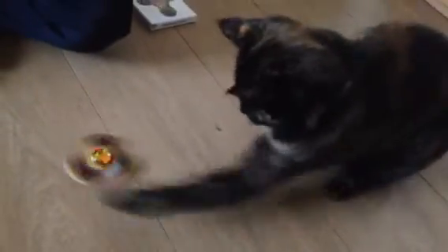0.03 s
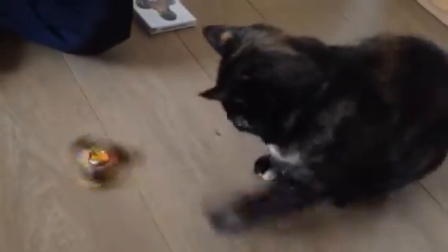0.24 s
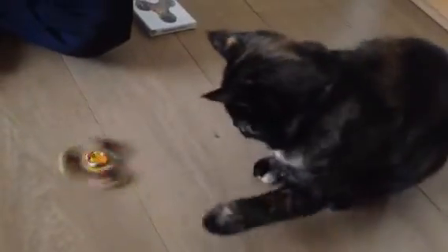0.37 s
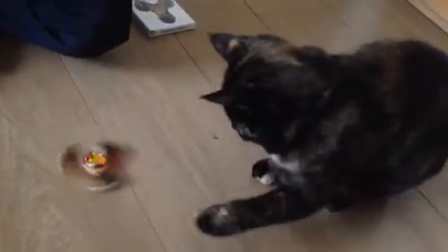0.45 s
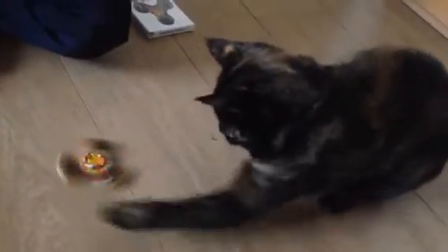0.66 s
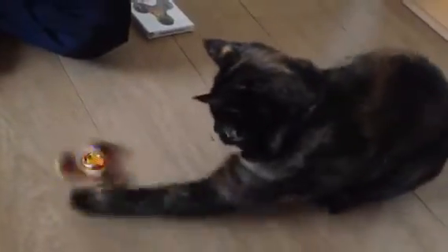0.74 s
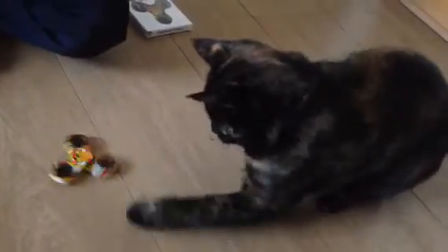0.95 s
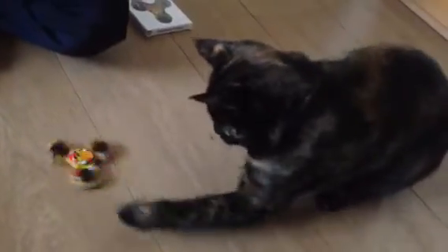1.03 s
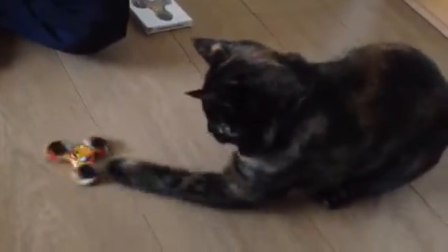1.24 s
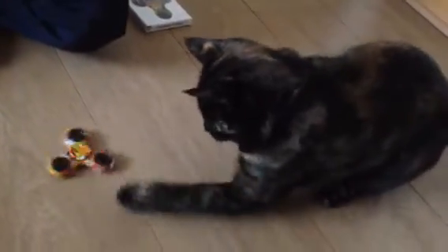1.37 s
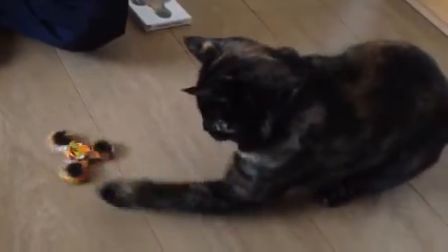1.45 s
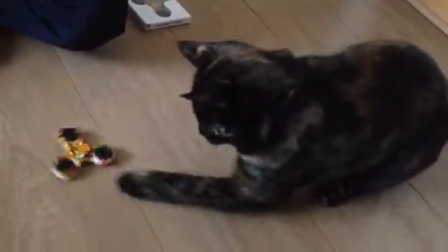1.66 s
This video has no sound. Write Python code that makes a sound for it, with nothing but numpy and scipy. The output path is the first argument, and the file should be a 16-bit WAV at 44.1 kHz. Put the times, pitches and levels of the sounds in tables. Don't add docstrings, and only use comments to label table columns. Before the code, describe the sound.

A small spinning toy takes one hard knock on hollow wooden floor, then clattering taps

```python
import sys
import numpy as np
from scipy import signal
from scipy.fft import rfft, irfft, next_fast_len
from scipy.io import wavfile
from scipy.ndimage import map_coordinates

SR = 44100
rng = np.random.default_rng(int(sys.argv[2]) if len(sys.argv) > 2 else 0)


def output_pcm(signal):
    pcm = np.clip(np.atleast_2d(signal).T, -1, 1) * 32767
    wavfile.write(sys.argv[1], SR, np.round(pcm).astype(np.int16))


def boost(x):
    u = np.asarray(x, float) / 20
    return 10 ** u


N = 74970
KNOCK_S = 0.2233

# frequency in Hz, level in dB.
AIR_COLOUR = [(30, 12.5), (80, 13.5), (160, 4.5), (380, 4), (700, -6.5), (1500, -17), (5000, -22.5),
              (10000, -22.5), (16000, -38)]
# time in seconds, level in dB.
RUB_LEVELS = [
    [(0.3, -85), (0.398, -67.5), (0.8, -80.5)],
    [(0.9, -79.5), (1.106, -76.5), (1.29, -84)],
    [(1.3, -75), (1.346, -74), (1.7, -88)],
]
# frequency in Hz, level in dB.
RUB_COLOUR = [(100, -38), (350, -3), (700, -12.5), (3000, -2.5), (6000, -9.5), (9000, -15), (12000, -12),
              (16000, -6)]
# frequency in Hz, level in dB.
SPIN_COLOUR = [(150, -25), (430, 11.5), (700, -9.5), (4400, -13.5), (5050, -13), (6800, -10), (9000, -20)]
# start in seconds, peak in dB, pitch in Hz,
# time to fall by 60 dB in seconds.
METAL_PINGS = [(.001, -58, 5050, 0.055), (.029, -64, 5050, 0.065), (.043, -49, 5050, 0.034),
               (.043, -62.5, 11720, 0.088), (.065, -67, 6030, 0.042), (.081, -73, 5960, 0.061),
               (.092, -81, 5050, 0.028), (.107, -53.5, 5050, 0.044), (.122, -58, 5050, 0.038),
               (.134, -56, 5050, 0.039), (.181, -75, 5050, .05), (.135, -79, 12300, 0.082),
               (.195, -72, 12450, .04), (.195, -49, 5050, 0.034)]
# frequency in Hz, level in dB.
CLAW_COLOUR = [(4000, -16), (5000, -11), (6800, -18), (8700, 4), (11000, -20), (12300, -20), (14000, 1),
               (16000, -17)]
# start in seconds, # peak in
# dB, length in seconds, brightness in dB per octave.
ARM_SCUFFS = [(0.2144, -24, 0.0054, 0), (.2235, -19, 0.0032, 4), (0.2425, -25, 0.0033, -1),
              (0.2452, -17, 0.0022, 5), (0.2523, -22, 0.0026, -1), (0.262, -33, 0.0025, -5),
              (0.266, -38, 0.0051, 3), (0.289, -43, 0.0039, -18), (0.339, -42, 0.0057, 1),
              (0.381, -38, 0.004, 2), (0.384, -37.5, 0.0056, -2.5), (0.4203, -40, 0.0029, -8),
              (0.4237, -36, 0.0044, -4.5), (0.43, -32.5, 0.0029, 0), (0.4674, -38.5, 0.0034, 1),
              (0.5003, -39, 0.0025, 1.5), (0.503, -38.5, 0.0049, -5), (.512, -45, 0.0018, -6),
              (0.5365, -34, 0.0036, -2.5), (0.565, -39, 0.0048, -3.5), (0.591, -47.5, 0.0056, 3.5),
              (0.616, -50, 0.0061, 1), (0.633, -44, 0.0056, -9), (0.652, -50.5, 0.0042, -1),
              (0.669, -50.5, 0.0022, -7),
              (0.9115, -42, 0.0054, -3), (0.9142, -39, .0025, -7), (0.944, -50, 0.0039, 3),
                (0.9654, -33.5, 0.0069, -1), (0.973, -39, 0.0043, 0.5), (1.015, -38.5, 0.0083, 0),
                (1.025, -45, 0.0026, -1), (1.052, -34.5, 0.004, -4), (1.0852, -39.5, 0.0038, -3.5),
                (1.114, -39.5, 0.0069, -1), (1.1188, -40.5, 0.0035, -1), (1.1404, -46.5, 0.0074, -3),
                (1.1672, -44, 0.0026, -1), (1.187, -46, 0.0023, -4), (1.204, -50.5, 0.0045, -7.5),
                (1.332, -46.5, 0.0027, -6.5), (1.3677, -40.5, 0.0041, -5.5), (1.371, -34, .003, 9),
                (1.4082, -38, 0.0044, -3), (1.414, -35.5, 0.0026, 2), (1.443, -42, 0.0078, 2),
                (1.474, -28.5, 0.0024, 8), (1.504, -48.5, 0.0079, -4), (1.528, -47, 0.009, -2.5),
                (1.551, -45, 0.0055, -1), (1.566, -52.5, 0.013, -8.5), (1.69, -57.5, 0.014, 0)]
# start in seconds, level in dB, length in seconds,
# brightness in dB per octave.
PAW_DRAGS = [
    (1.325, -43, 0.015, 7.5),
]
# frequency in Hz, level in dB.
SCUFF_COLOUR = [(200, -21), (900, -3), (3600, -19.5), (5400, 0), (8000, 2), (11200, -13), (14000, -8),
                (16000, -6.5)]
# start in seconds, peak in dB, pitch in Hz,
# level of the lower tone in dB, level of the woody top in dB.
ARM_THUMPS = [(0.083, -53, 417, -12, 8), (0.126, -56, 412, -4, 0), (0.212, -29, 372, -1.5, -2),
              (0.424, -43.5, 393, -12, -5), (0.4641, -45.5, 336, 1, 9), (0.501, -50, 456, 7, -3),
              (0.5362, -35.5, 398, -0.5, 9), (0.5637, -35.5, 365, -9, 11), (0.5886, -42.5, 353, 6, 14),
              (0.6333, -43.5, 383, 10, -16), (0.652, -47.5, 250, -8, 0), (0.811, -55, 430, 6, 5),
              (0.9101, -37.5, 395, 0.5, -6), (0.9663, -26.5, 389, 0.5, -3), (1.013, -31.5, 391, -12, -7),
              (1.051, -33, 378, -11, 7), (1.084, -32.5, 390, 1, -3), (1.116, -55.5, 410, -3, 25.5),
              (1.1398, -47.5, 293, 3, 8), (1.166, -41.5, 248, 2, -10), (1.185, -46.5, 393, 11, -6),
              (1.2045, -45, 397.4, 9, -13), (1.218, -53.5, 417, 3, -6), (1.3209, -37, 365, -7, -1),
              (1.3671, -27.5, 405, -2, -11), (1.407, -30.5, 413, 1.5, -8), (1.447, -35, 380, 2.5, -7),
              (1.502, -41, 370, -4, 8), (1.527, -40.5, 363, 6, 11), (1.551, -42, 398, 0, 6),
              (1.57, -46.5, 305, 0, 0)]
# pitch in Hz, level in dB, time to fall by 60 dB in seconds.
BOARD_TONES = [(375.7, -2.5, 0.061), (412, -5.5, 0.063), (513, -5, 0.032), (884, -4, 0.028),
               (1143, -14, 0.046), (2192, -19, 0.1), (2965, -23.5, 0.093)]
# start in seconds, peak in dB, pitch in Hz, # time to fall by 60 dB
# in seconds.
REBOUNDS = [(0.2336, -45, 940, 0.019), (.2365, -30.5, 592, 0.043), (0.2389, -31, 923, 0.022),
            (0.244, -33, 1280, 0.014), (0.2425, -32.5, 199, 0.033), (0.2458, -23.5, 347.6, 0.053),
            (0.2548, -30, 410, 0.054), (.2612, -27, 2210, 0.011), (0.2619, -34.5, 439, 0.071),
            (0.2595, -54, 1100, 0.014), (.27, -35.5, 238, 0.055), (.273, -39, 608, 0.057),
            (.285, -43, 590, 0.062), (.29, -43.5, 830, 0.043), (.2152, -43.5, 6130, 0.021),
            (.2525, -39, 6470, .02), (.2465, -43, 6330, 0.0094)]
# frequency in Hz, level in dB.
SKID_COLOUR = [(150, 3.5), (360, 4.5), (600, 6.5), (1500, -4.5), (4000, 1), (9000, -8.5), (15000, -22)]
# delay in seconds, level in dB.
WALL_SLAPS = [
    (0.013, -16),
    (0.0265, -12.5),
    (0.042, -17),
]
# frequency in Hz, time to fall by 60 dB in seconds.
ROOM_DECAY = [(200, 0.72), (1000, 0.51), (5000, 0.45), (14000, 0.36)]


def unit(x):
    return x / np.sqrt(np.mean(x ** 2) + 1e-20)


def along(points, hz):
    f, v = np.transpose(points)
    return np.interp(np.log(hz + 1), np.log(f + 1), v)


def filtered(x, response):
    m = next_fast_len(len(x) + 4096)
    spectrum = rfft(x, m) * response(np.fft.rfftfreq(m, 1 / SR))
    return irfft(spectrum, m)[:len(x)]


def noise(colour, size, tilt_db=0):
    def response(hz):
        octaves = np.log2(np.maximum(hz, 3500) / 6000)
        return boost(along(colour, hz) + tilt_db * octaves)
    return unit(filtered(rng.standard_normal(size), response))


def wander(count, steps):
    return map_coordinates(rng.standard_normal(count), [steps])


def ring(hz, db, t60, attack_s):
    t = np.arange(SR // 4) / SR
    return boost(db - 60 * t / t60) * np.sin(2 * np.pi * hz * t) * (1 - np.exp(-t / attack_s))


def add(track, s, sound):
    part = track[max(round(s * SR), 0):][:len(sound)]
    part += sound[:len(part)]


def air():
    return boost(-64) * noise(AIR_COLOUR, N)


def whirr():
    t = np.arange(N) / SR
    s, db = np.transpose(sum(RUB_LEVELS, []))
    level = np.interp(t, s, db, left=-120) + 1.5
    return boost(level + 2.8 * wander(300, t * 90)) * noise(RUB_COLOUR, N)


def spinning_hum():
    t = np.arange(round(KNOCK_S * SR)) / SR
    hum = boost(-70 + 2.3 * wander(40, t * 70)) * noise(SPIN_COLOUR, len(t))
    bearing_level = boost(-77.5 + 2.4 * wander(40, t * 110))
    bearing_phase = 2 * np.pi * 5050 * t + 1.7 * wander(40, t * 90)
    out = np.zeros(N)
    add(out, 0, hum + bearing_level * np.sin(bearing_phase))
    return out


def pings():
    pair_hz = 106
    out = np.zeros(N)
    for s, db, hz, t60 in METAL_PINGS:
        add(out, s, ring(hz, db, t60, 0.0015) + ring(hz + pair_hz, db - 15, t60, 0.00034))
    return out


def scrape():
    start_s, length_s, level_db, sag = 0.93, 0.05, -62, 0.202
    u = np.linspace(0, 1, round(length_s * SR))
    swell = boost(level_db + 1.6 * wander(40, u * 30)) * np.sin(np.pi * u)
    position = np.cumsum(1 + sag * (0.5 - u))
    grit = map_coordinates(noise(CLAW_COLOUR, 2 * len(u)), [position])
    out = np.zeros(N)
    add(out, start_s, swell * grit)
    return out


def patchy_colour():
    hz = np.linspace(200, 16000, 16)
    patches_db = 3.5 * rng.standard_normal(len(hz)) * (hz > 1000)
    return np.transpose([hz, along(SCUFF_COLOUR, hz) + patches_db])


def scuffs():
    out, t = np.zeros(N), np.arange(SR // 10) / SR
    rows = [(*row, 0.0007) for row in ARM_SCUFFS]
    rows += [(*row, 0.17 * row[2]) for row in PAW_DRAGS]
    for s, db, length_s, tilt_db, rise_s in rows:
        grains = np.repeat(rng.standard_normal(len(t) // 24 + 1), 24)[:len(t)]
        shape = (1 - np.exp(-t / rise_s)) * np.exp(-(t / max(length_s, 0.0005)) ** 1.3)
        slide = unit(shape * boost(3.3 * grains) * noise(patchy_colour(), len(t), tilt_db))
        add(out, s, boost(db - 11) * slide * np.sqrt(np.mean(shape ** 2)))
    return out


def thumps():
    attack_s, low_t60, lag_s = 0.0036, 0.039, 0.00093
    out = np.zeros(N)
    for s, db, hz, low_db, top_db in ARM_THUMPS:
        main = -ring(hz, db + 8.5, 0.023, attack_s)
        low = ring(219, db + low_db - 6.5, low_t60, attack_s)
        boom = ring(164.3, db - 11.5, low_t60, attack_s)
        top_hz = 1100 * (1 + 0.15 * rng.normal())
        top = ring(top_hz, db + top_db - 20.5, 0.009, 0.0004)
        add(out, s + lag_s, main + low + boom + top)
    return out


def knock():
    snap_s, snap_db, knock_db = 0.00008, -14.5, -21
    crack_db, crack_t60, rebound_crack_db = -21, 0.028, -4.5
    skid_db, skid_hold_s, skid_t60 = -40.5, 0.035, 0.14
    out, t = np.zeros(N), np.arange(SR // 2) / SR
    add(out, KNOCK_S - 2 * snap_s, -boost(snap_db) * np.exp(-(t / snap_s - 2) ** 2))
    for hz, db, t60 in BOARD_TONES:
        add(out, KNOCK_S, ring(hz, knock_db + db, t60, 0.00025))
    cracks = [(KNOCK_S, crack_db)] + [(s, db + rebound_crack_db) for s, db, *_ in REBOUNDS]
    for s, db in cracks:
        add(out, s, boost(db - 60 * t / crack_t60) * rng.standard_normal(len(t)) / 3)
    for s, db, hz, t60 in REBOUNDS:
        add(out, s, ring(hz, db, t60, 0.0015))
    fall_db = -60 * np.maximum(t - skid_hold_s, 0) / skid_t60
    lumps_db = 4.05 * wander(200, t * 250)
    add(out, KNOCK_S, boost(skid_db + fall_db + lumps_db) * noise(SKID_COLOUR, len(t)))
    return out


def wall_slaps(taps, blow):
    def walls(f):
        echoes = sum(boost(db) * np.exp(-2j * np.pi * f * s) for s, db in WALL_SLAPS)
        return echoes / (1 + 1j * f / 970) ** 2
    return filtered(taps + boost(-10.5) * blow, walls)


def room_tail(sound):
    hz, t, z = signal.stft(rng.standard_normal(SR // 2), SR, nperseg=256)
    fading = z * boost(-60 * t / along(ROOM_DECAY, hz)[:, None])
    tail = signal.istft(fading, SR, nperseg=256)[1]
    tail = filtered(tail, lambda f: (1j * f / (490 + 1j * f)) ** 2)
    out = np.zeros(N)
    add(out, 0.008, signal.fftconvolve(sound, boost(-10.5) * tail / np.linalg.norm(tail)))
    return out


def scene():
    background = air() + whirr() + spinning_hum() + pings() + scrape()
    taps, blow = scuffs() + thumps(), knock()
    echoes = wall_slaps(taps, blow) + room_tail(taps + blow)
    return (background + taps + blow + echoes)[None]


def roll_off(x):
    return signal.sosfilt(signal.butter(12, 16450, fs=SR, output="sos"), x)


def record(dry):
    def microphone(f):
        port_hz, width_hz, port_db = 6166, 482, 9.5
        port = 1 + boost(port_db) * 1j * f * width_hz / (port_hz ** 2 - f * f + 1j * f * width_hz)
        treble_edge = 1 / (1 + (f / 15200) ** 120)
        low_cut = (1j * f / (100 + 1j * f)) ** 2
        return port * treble_edge * low_cut
    return roll_off(filtered(dry[0], microphone)[None])


dry = scene()
out = record(dry)
output_pcm(out)
```